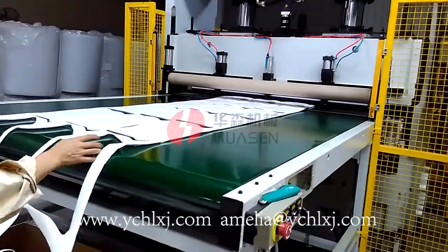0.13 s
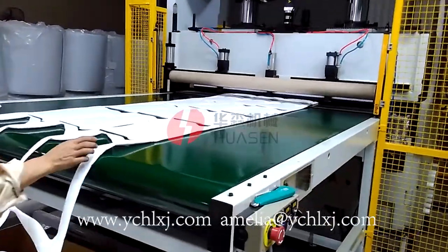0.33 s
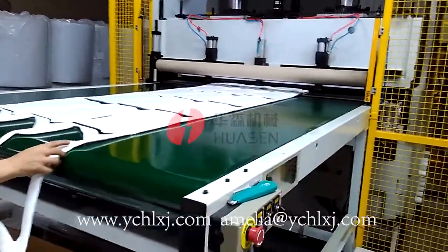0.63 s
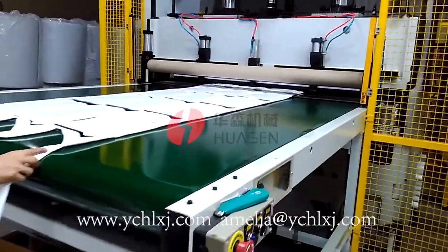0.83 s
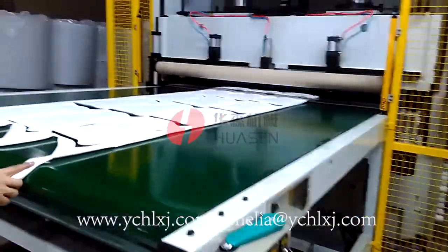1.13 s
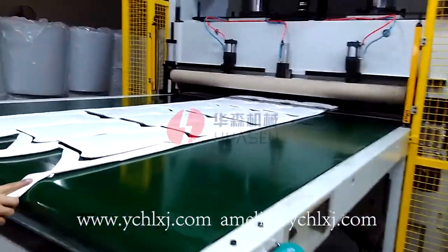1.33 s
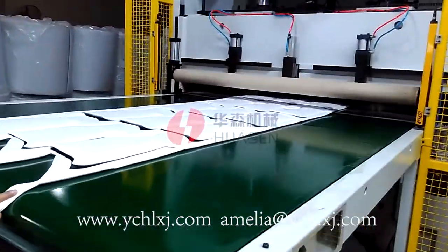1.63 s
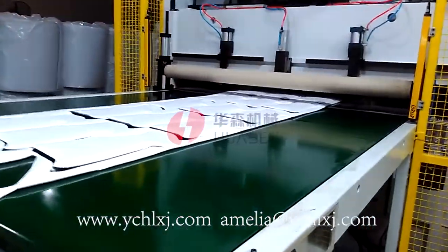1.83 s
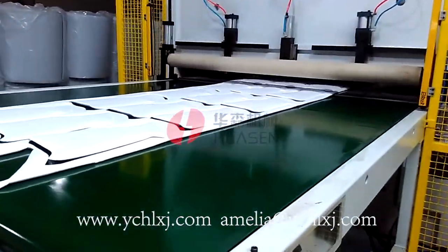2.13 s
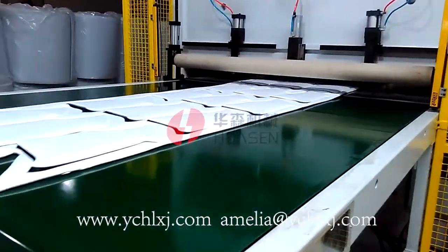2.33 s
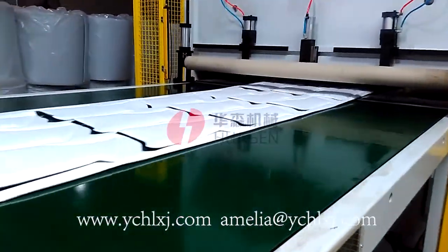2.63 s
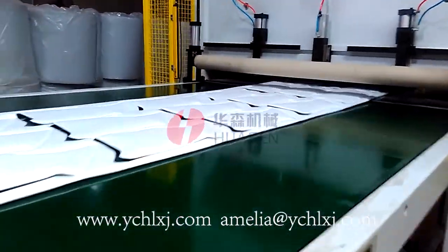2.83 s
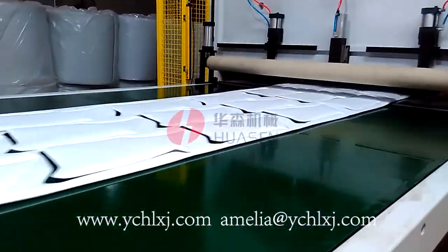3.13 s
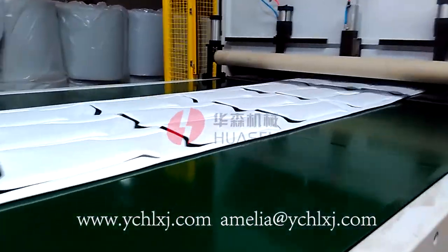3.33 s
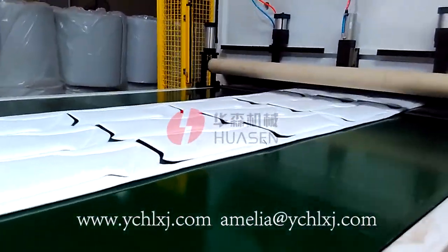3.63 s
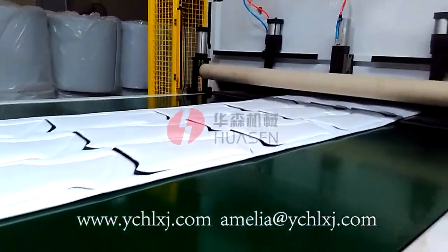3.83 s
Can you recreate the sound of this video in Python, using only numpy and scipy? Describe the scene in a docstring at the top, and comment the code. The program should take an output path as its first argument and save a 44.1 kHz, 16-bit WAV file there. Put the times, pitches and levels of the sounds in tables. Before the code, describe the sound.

A hydraulic cutting press drones throughout, close by in a factory hall and leaning left. Air bursts from a valve at 0.3 seconds, and the head thuds and clanks around 1 second. At 1.7 the conveyor starts with a low boom, air blasts and a clank. Cut sheet crackles and rasps on the left until about 3 seconds, while a thin high whine wavers from 2.2 to 3.6.

```python
"""Cutting press and belt conveyor in a factory hall.

Heard from near the machine on a two-port stereo microphone, most of it leaning left. The hydraulic pump
groans under load, a valve lets go, the head thuds and clanks and is lifted. Then the belt jerks into
motion with blasts of air, the cut sheet crackles as it peels away, and the belt drive whines."""
import sys
import numpy as np
from scipy import signal
from scipy.fft import rfft, irfft
from scipy.io import wavfile

SR = 44100
rng = np.random.default_rng(int(sys.argv[2]) if len(sys.argv) > 2 else 0)


def wrap_up_sound(samples):
    """Save the sound to the file named by the first command line argument, as 16-bit audio."""
    columns = np.atleast_2d(samples).T
    # keep every value between -1 and 1, then stretch to whole-number steps
    tamed = np.clip(columns, -1, 1)
    steps = np.round(tamed * 32767).astype(np.int16)
    wavfile.write(sys.argv[1], SR, steps)


N = 176400
T = np.arange(N) / SR
FEED_START_S, HALL_T60_S = 1.69, 0.75
BASS_PAN_DB = 2.5  # every pan is left level minus right level

# phase of the microphone's right port against the left: f/Hz, phase/rad
PORT_PHASE = [(100, 3.05), (300, 2.74), (600, 2.55), (1000, 1.82), (1700, 1.1), (4000, 0.092)]
# blasts of air from the valves: t/s, level/dB, hold/s, t60/s, pan/dB
AIR_BLASTS = [(.301, 0.5, 0.01, 0.064, 5), (1.71, -5.5, 0.057, 0.21, 4.5), (1.794, 6, 0.0024, 0.038, 6)]


def amp(db):
    """Decibels to gain."""
    return 10 ** (np.asarray(db) / 20)


def in_time(rows):
    """A curve in time, its points joined by straight lines."""
    return np.interp(T, *np.transpose(rows))


def at_hz(points, hz):
    """A spectrum read on a log-frequency axis."""
    freqs, values = np.transpose(points)
    return np.interp(np.log(np.maximum(hz, 1)), np.log(freqs), values)


def drift(rate_hz):
    """A smooth random wander with spread 1."""
    step, settle = 40, 2000
    pole = np.exp(-2 * np.pi * rate_hz * step / SR)
    white = rng.standard_normal(N // step + settle + 2)
    slow = signal.lfilter([1], [1, -2 * pole, pole * pole], white)[settle:]
    return np.interp(np.arange(N) / step, np.arange(len(slow)), slow / slow.std())


def noise(spectrum, pan_db):
    """Noise at the two ports: opposed in the bass, unrelated and panned by pan_db in the treble."""
    likeness = [(100, 1), (300, 0.99), (600, 0.91), (1000, 0.94), (1800, 0.033), (4000, 0.013)]  # between the ports: f/Hz, coherence
    hz = np.arange(N // 2 + 1) * SR / N
    left, unrelated = rfft(rng.standard_normal((2, N)))
    alike = np.clip(at_hz(likeness, hz), 0, 1)
    right = (alike * left + np.sqrt(1 - alike ** 2) * unrelated) * np.exp(1j * at_hz(PORT_PHASE, hz))
    right *= amp(-at_hz([(350, BASS_PAN_DB), (2000, pan_db)], hz))
    low_cut = np.minimum(hz / spectrum[0][0], 1) ** 2
    # the hall's closely spaced resonances ripple the spectrum
    knots_hz = np.arange(0, SR / 2, 45)
    ripple_db = 2 * np.interp(hz, knots_hz, rng.standard_normal(len(knots_hz)))
    colour = amp(at_hz(spectrum, hz) + ripple_db * np.minimum(hz / 1500, 1)) * low_cut
    return irfft(np.array([left, right]) * colour, N) * np.sqrt(SR / 2)


def envelope(start, hold, t60, attack_s, tail_db):
    """Attack, hold and release, followed by the hall's tail."""
    attack = np.clip((T - start) / attack_s, 0, 1)
    after = np.maximum(T - start - hold, 0)
    return attack * np.hypot(amp(-60 * after / t60), amp(tail_db - 60 * after / HALL_T60_S))


def bursts(hits, spectrum, attack_s, tail_db, rattle_db):
    """Blows or blasts that excite many close resonances at once."""
    rattle = amp(rattle_db * drift(62))
    return rattle * sum(noise(spectrum, pan) * amp(db) * envelope(start, hold, t60, attack_s, tail_db)
                        for start, db, hold, t60, pan in hits)


def struck(hits, modes, attack_s=0.0026):
    """A body's modes, set ringing by each hit and heard at the two ports."""
    out = np.zeros((2, N))
    for start, db, *_ in hits:
        age = np.maximum(T - start, 0)
        for hz, mode_db, t60 in modes:
            level = amp(db + mode_db - 60 * age / t60) * np.minimum(age / attack_s, 1)
            phase = 2 * np.pi * hz * age
            right = amp(-BASS_PAN_DB) * np.sin(phase + at_hz(PORT_PHASE, hz))
            out += level * np.array([np.sin(phase), right])
    return out


def hall(feed_db=-2):
    """Room tone of the hall, easing a little once the belt feeds."""
    colour = [(25, -85), (48, -56.5), (100, -64.5), (190, -66.5), (290, -58.5), (470, -73.5), (680, -63.5),
              (900, -67), (1100, -70.5), (1550, -67.5), (1950, -73.5), (2600, -70), (3500, -79),
              (8300, -78), (14500, -102)]  # f/Hz, level/dB per Hz
    return noise(colour, pan_db=3.5) * amp(feed_db * np.clip((T - FEED_START_S) / .5, 0, 1))


def pump_tones(orders, start, end, pan_db, rise_s=0.025, fall_s=0.067, waver_db=2, wobble_rad=0.22):
    """Multiples of the shaft speed, each wavering a little, while one working state lasts."""
    shaft_speed = [(0, 24.48), (.3, 24.48), (.36, 24.84), (1, 24.84), (1.1, 24.62), (1.68, 24.62),
                   (1.8, 24.835)]  # t/s, rotation/Hz
    angle = 2 * np.pi * np.cumsum(in_time(shaft_speed)) / SR
    gate = np.clip((T - start) / rise_s, 0, 1) * np.exp(-np.maximum(T - end, 0) / fall_s)
    out = np.zeros((2, N))
    for order, db in orders.items():
        phase = order * angle + rng.uniform(0, 2 * np.pi) + wobble_rad * drift(9.5)
        hz = order * shaft_speed[0][1]
        lean_db = at_hz([(350, BASS_PAN_DB), (900, pan_db)], hz) / 2
        level = np.sqrt(2) * amp(db + waver_db * drift(6.1))
        left = amp(lean_db) * np.sin(phase)
        right = amp(-lean_db) * np.sin(phase + at_hz(PORT_PHASE, hz))
        out += level * np.array([left, right])
    return out * gate


def pump(press_end_s=0.39, lift_start_s=1.165, lift_end_s=1.645, mid_feed_s=2.48, late_feed_s=3.31):
    """The pump strains until the first valve opens, idles, lifts the head and runs on with the belt."""
    # tones of each working state: multiple of shaft speed, level/dB
    straining = {38: -34.5, 39: -32, 40: -33.5, 46: -42, 104: -49, 117: -45}
    pressing = {12: -42, 26: -35, 52: -43, 64: -33.5, 65: -32.5, 66: -39, 68: -42}
    idling = {2: -45, 11: -45, 12: -38, 24: -45, 26: -41.5, 36: -48, 40: -50.5, 53: -49.5, 65: -43, 66: -54,
              108: -56}
    lifting = {11: -47, 12: -35.5, 13: -34, 26: -44.5, 30: -51.5, 39: -37.5, 48: -45.5, 53: -46.5, 65: -49,
               66: -41, 68: -40, 69: -42.5, 130: -53.5, 234: -54}
    feeding = {2: -49, 11: -45.5, 12: -40, 13: -34, 24: -53, 26: -38.5, 35: -50, 36: -43.5, 39: -46.5, 53:
               -49, 65: -53, 66: -48.5, 108: -54.5, 247: -53}
    mid_feed = {78: -44.5}
    late_feed = {36: -37.5, 59: -50}
    return (pump_tones(straining, -1, AIR_BLASTS[0][0], pan_db=4)
            + pump_tones(pressing, -1, press_end_s, pan_db=4)
            + pump_tones(idling, press_end_s, lift_start_s, pan_db=8)
            + pump_tones(lifting, lift_start_s, lift_end_s, pan_db=6)
            + pump_tones(feeding, FEED_START_S, N / SR, pan_db=7)
            + pump_tones(mid_feed, mid_feed_s, late_feed_s, pan_db=8)
            + pump_tones(late_feed, late_feed_s, N / SR, pan_db=8))


def line_hiss():
    """Oil and air hiss in the lines, further left once the belt runs."""
    colour = [(500, -6.5), (2500, -13), (3200, -16.5), (5000, -14.5), (6700, -11), (8300, -0.5),
              (10000, -10), (11500, -17.5), (14500, -23.5)]  # f/Hz, level/dB
    level = [(0, -59), (.39, -57.5), (.5, -72), (.85, -80), (.94, -61), (.99, -64), (1.1, -62.5),
             (1.4, -92), (1.49, -76), (1.64, -73.5), (1.75, -61.5), (2.98, -63), (3.44, -66), (3.53, -58.5),
             (3.8, -61.5), (3.95, -58)]  # t/s, level/dB
    hiss = np.where(T < FEED_START_S, noise(colour, pan_db=4.5), noise(colour, pan_db=7.5))
    return amp(in_time(level)) * hiss


def valves():
    """The valves blow off air, and a thin metal part rings after their clacks."""
    air_colour = [(200, -54.5), (600, -51), (1100, -53.5), (1400, -57), (2000, -54), (2750, -58),
                  (3600, -68.5), (4500, -57.5), (5300, -51), (6700, -54), (8300, -44.5), (10500, -59.5),
                  (14500, -70.5)]  # f/Hz, level/dB
    rings = [(.301, -5, 0.014, 0.32, 0.5), (1.799, 0.5, 0.017, 0.42, 2)]  # t/s, level/dB, hold/s, t60/s, pan/dB
    ring_colour = [(1800, -90), (2600, -52), (3050, -64), (3600, -49.5), (4400, -55), (6500, -103)]  # f/Hz, level/dB
    return (bursts(AIR_BLASTS, air_colour, attack_s=0.0018, tail_db=-7.5, rattle_db=1.5)
            + bursts(rings, ring_colour, attack_s=0.0018, tail_db=-18, rattle_db=0.5))


def press_head():
    """The head comes down with dull blows; the die lands and seats, and the bed rings."""
    thuds = [(.994, -3.5, 0.044, 0.12, -0.5), (1.016, -0.5, 0.044, 0.29, 10), (1.076, -2, 0.011, 0.1, -4.5)]  # t/s, level/dB, hold/s, t60/s, pan/dB
    colour = [(40, -62), (90, -41), (170, -47), (245, -33.5), (380, -45.5), (490, -43), (700, -48),
              (1200, -52.5), (1600, -48.5), (2000, -58.5), (2900, -59.5), (4000, -67.5), (14000, -78)]  # f/Hz, level/dB
    die_knocks = [(1.017, -10), (1.08, -21)]  # t/s, level/dB
    bed_modes = [(227, -9, .25), (258, 1, 0.29)]  # f/Hz, level/dB, t60/s
    return bursts(thuds, colour, attack_s=0.002, tail_db=-13, rattle_db=0) + struck(die_knocks, bed_modes)


def metal_clicks():
    """Sharp clicks of metal, with very little of the hall on them."""
    clicks = [(1.0148, 4.5, 0.0015, 0.023, 0), (1.7965, -5, .006, 0.077, -1)]  # t/s, level/dB, hold/s, t60/s, pan/dB
    colour = [(1000, -95), (2300, -50.5), (3100, -48), (3800, -54.5), (4600, -57), (6000, -59),
              (10500, -54.5), (14500, -83)]  # f/Hz, level/dB
    return bursts(clicks, colour, attack_s=0.00032, tail_db=-27, rattle_db=0.8)


def frame():
    """The steel frame clanks, its strongest modes ringing through the noise."""
    clanks = [(1.085, 1.5, 0.011, 0.047, 6), (1.805, -9, 0.03, 0.44, 9)]  # t/s, level/dB, hold/s, t60/s, pan/dB
    colour = [(150, -40), (400, -43), (550, -50.5), (750, -44), (1650, -45.5), (1980, -50), (2250, -49.5),
              (2900, -66.5), (9000, -67.5), (14000, -84)]  # f/Hz, level/dB
    modes = [(907, -14, 0.14), (1258, -29, .11), (1590, -10.5, .09)]  # f/Hz, level/dB, t60/s
    return bursts(clanks, colour, attack_s=0.0028, tail_db=-6, rattle_db=-0.5) + struck(clanks, modes)


def belt():
    """The belt jerks into motion with a low boom."""
    jerks = [(1.710, -4.5), (1.722, 3), (1.753, -5), (1.791, -4)]  # t/s, level/dB
    boom_modes = [(109.2, -6, 0.67), (129.4, -18, 0.49), (177, -8, 0.19)]  # f/Hz, level/dB, t60/s
    return struck(jerks, boom_modes)


def sheet(pan_db=19, snap_gain_db=14, swell_s=2.8, swell_width_s=.07):
    """Well to the left, the cut sheet peels off in snaps that thicken to a tear; it rasps as it rubs."""
    snap_events = [(1.764, -14.5), (1.829, -12), (1.8942, -7), (1.921, -12), (1.9804, -11.5), (1.9942, -22),
                   (2.0116, -13), (2.1558, -18), (2.167, -14), (2.18, -11), (2.1895, -11), (2.2327, -11),
                   (2.247, -8.5), (2.2702, -7.5), (2.2958, -4), (2.3148, -11), (2.344, -8), (2.3772, -8),
                   (2.4149, -7), (2.4854, -3.5), (2.5177, -6), (2.5402, -6), (2.5446, -7), (2.57, -7),
                   (2.5861, -7.5), (2.6008, -5), (2.616, -11.5), (2.635, -8.5), (2.656, -9.5), (2.6715, -7),
                   (2.6897, -8.5), (3.8505, -18)]  # t/s, relative level/dB
    peel_colour = [(200, -73), (450, -57.5), (800, -68.5), (1350, -66), (1870, -56.5), (2600, -57),
                   (3100, -65), (4000, -57.5), (5900, -53.5), (6900, -54), (8300, -47), (10900, -66.5),
                   (13800, -62)]  # f/Hz, level/dB
    treble_level = [(1.9, -7), (2.17, 5.5), (2.3, -12.5)]  # t/s, level/dB
    treble_colour = [(7000, -88), (12500, -54)]  # f/Hz, level/dB
    snaps = sum(amp(db + snap_gain_db) * envelope(start, hold=.002, t60=.008, attack_s=.0004, tail_db=-38)
                for start, db in snap_events)
    snap_noise = noise(peel_colour, pan_db) + amp(in_time(treble_level)) * noise(treble_colour, pan_db)

    # fine crackle between the snaps, swelling once more before the sheet comes free
    crackle_level = [(1.7, -45), (1.82, -15), (2.02, -11), (2.14, -31), (2.2, -9), (2.22, -10), (2.28, -4),
                     (2.46, -8.5), (2.56, -6.5), (2.68, -3), (2.76, 1.5), (2.87, 0), (2.96, -10),
                     (3.1, -23)]  # t/s, level/dB
    swell_colour = [(3500, -78), (5600, -53), (7500, -74)]  # f/Hz, level/dB
    crackle = amp(in_time(crackle_level) + 2.2 * drift(220))
    swell = np.exp(-((T - swell_s) / swell_width_s) ** 2)
    crackle_noise = noise(peel_colour, pan_db=14) + swell * noise(swell_colour, pan_db)

    rasp_level = [(2.15, -11), (2.3, -2), (2.45, -19), (2.5, -2), (2.68, 1), (2.8, -11), (3.3, -22),
                  (3.5, -48)]  # t/s, level/dB
    rasp_resonance = [(1300, -78), (1700, -58), (1870, -48.5), (2050, -63), (4000, -105)]  # f/Hz, level/dB
    rasp = amp(in_time(rasp_level) + 3.8 * drift(75))
    return snaps * snap_noise + crackle * crackle_noise + rasp * noise(rasp_resonance, pan_db)


def drive_whine(hz=8004, right_db=-32.5, right_follows=0.15):
    """The belt drive's switching tone swells and fades at the left port and stays faint at the right."""
    left_level = [(2.22, -57), (2.32, -21.5), (2.47, -15.5), (2.62, -47), (2.78, -29), (2.97, -16),
                  (3.07, -28.5), (3.2, -16), (3.28, -24.5), (3.34, -19.5), (3.4, -41), (3.5, -20),
                  (3.58, -45)]  # t/s, level/dB
    left_db = in_time(left_level)
    running = (T > left_level[0][0]) * (T < left_level[-1][0])
    phase = 2 * np.pi * hz * T + .1 * drift(20)
    right_gain = amp(right_db + right_follows * (left_db - left_db.max()))
    return np.sqrt(2) * running * np.array([amp(left_db) * np.sin(phase), right_gain * np.cos(phase)])


def scene():
    """One press stroke and the feed after it, as they reach the microphone."""
    return (hall() + pump() + line_hiss() + valves() + press_head() + metal_clicks() + frame()
            + belt() + sheet() + drive_whine())


def record(dry, ceiling=0.94, cutoff_hz=14350):
    """The recorder rounds the peaks and cuts the top."""
    low_pass = signal.ellip(10, .2, 70, cutoff_hz, fs=SR, output="sos")
    return signal.sosfilt(low_pass, ceiling * np.tanh(dry / ceiling))


dry = scene()
out = record(dry)
wrap_up_sound(out)
```